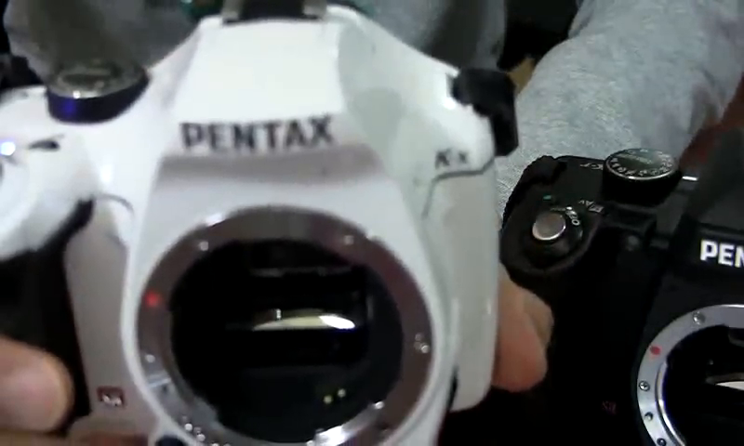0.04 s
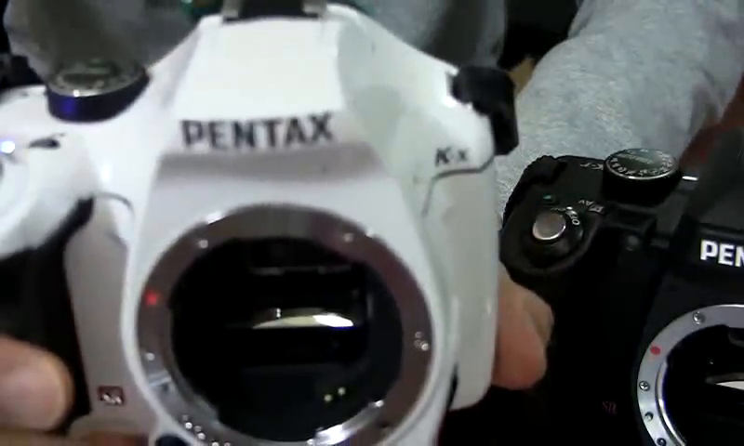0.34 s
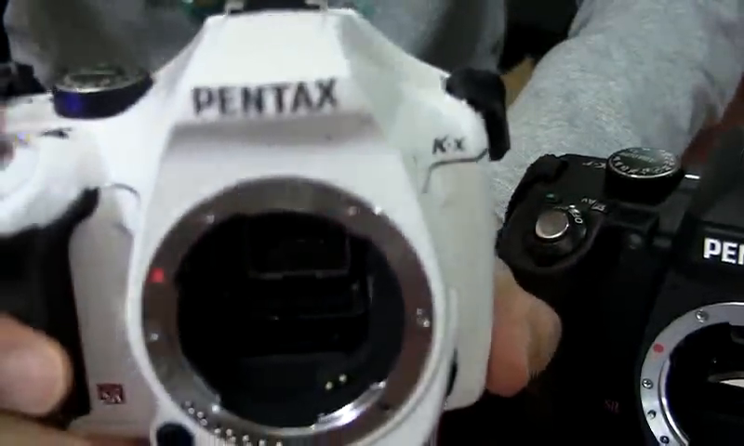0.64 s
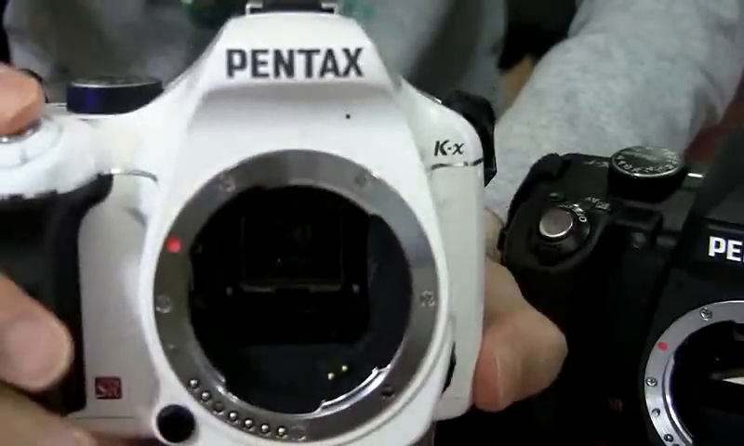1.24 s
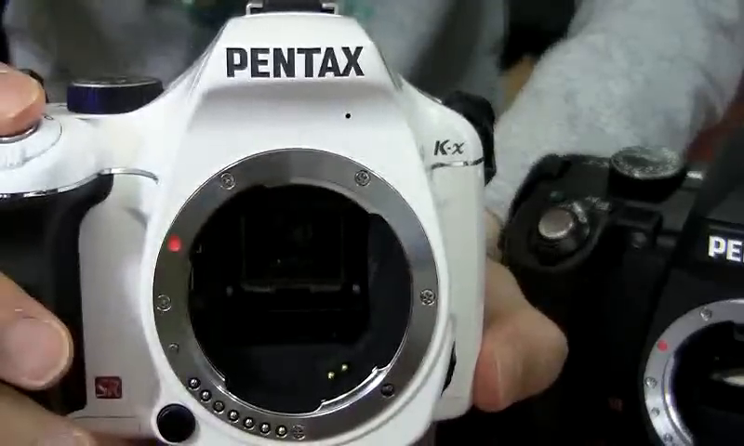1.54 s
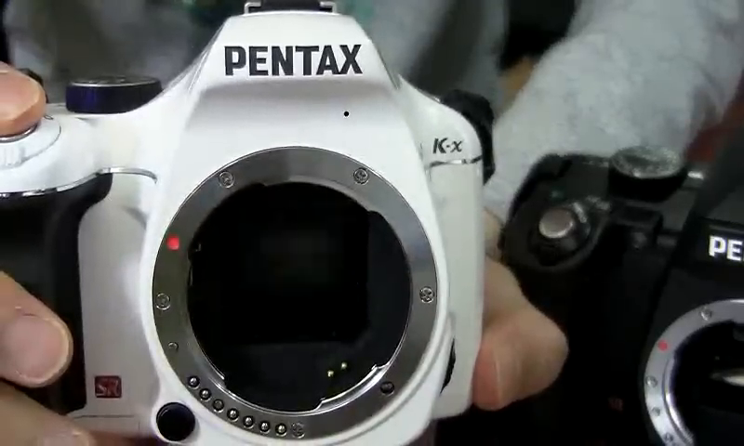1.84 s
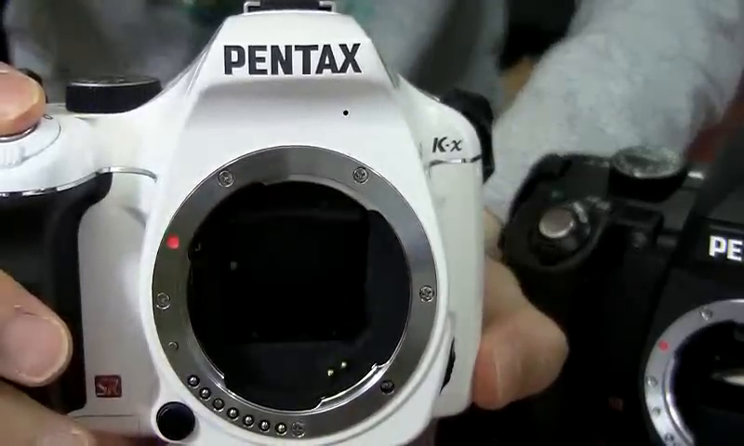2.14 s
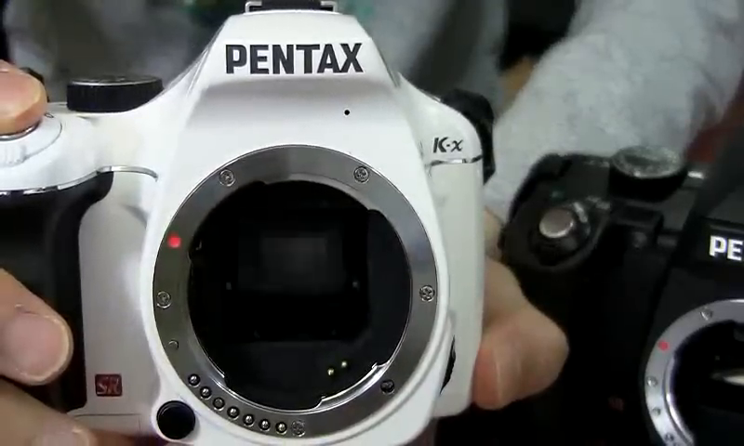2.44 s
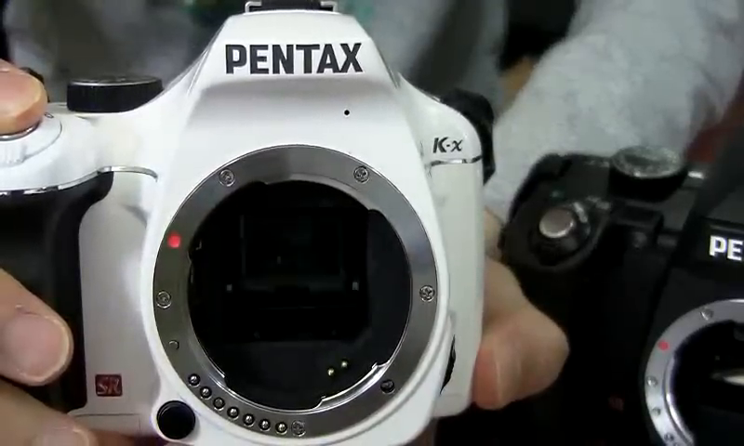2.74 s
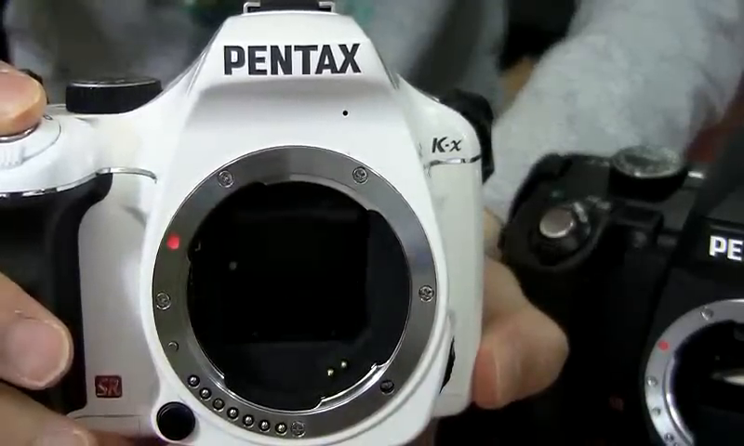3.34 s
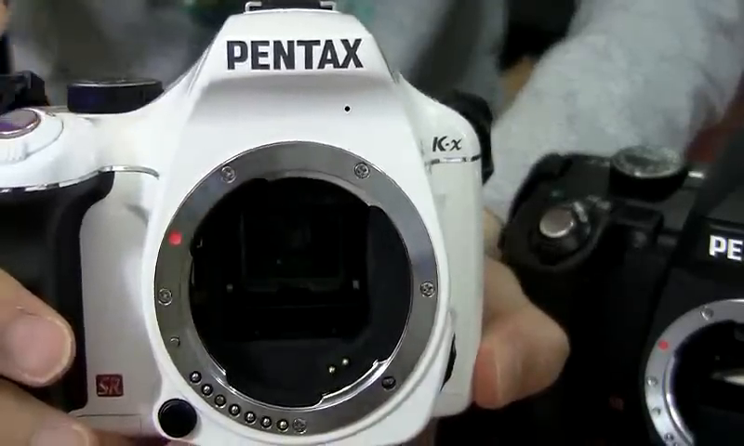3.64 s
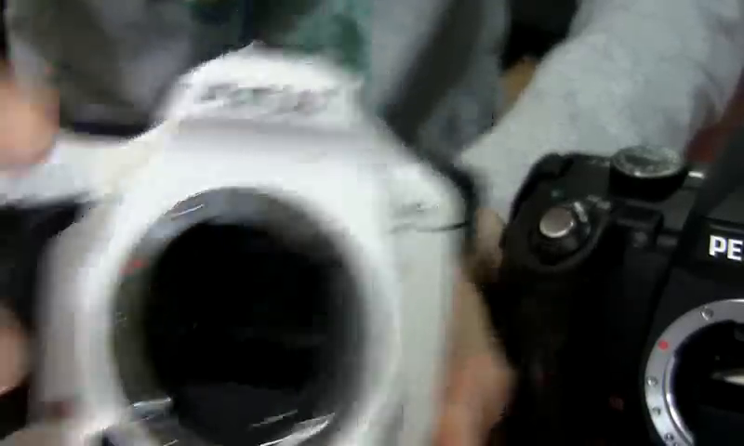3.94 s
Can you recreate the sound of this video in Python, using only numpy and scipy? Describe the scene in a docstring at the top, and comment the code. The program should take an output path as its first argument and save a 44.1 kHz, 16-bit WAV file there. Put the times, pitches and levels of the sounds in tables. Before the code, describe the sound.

A camera shutter fires a rapid burst of seven sharp clacks, close to the microphone in a small room. Before it, a fan rumbles and fingers faintly rub the camera; afterwards the release button clicks softly.

```python
"""A small room with a rumbling fan. Close up, a lensless reflex camera fires seven frames, four a second.
In each frame the mirror lifts, two shutter curtains snap across, the mirror drops and bounces, and a
geared motor recocks it. Fingers rub the shell; the release clicks before and after the burst.
The recorder's gain control holds the fan up, ducks it under the burst and lets it creep back."""
import sys
import numpy as np
from scipy import signal
from scipy.fft import rfft, irfft
from scipy.io import wavfile
from scipy.ndimage import uniform_filter1d, minimum_filter1d

SR = 44100
rng = np.random.default_rng(int(sys.argv[2]) if len(sys.argv) > 2 else 0)


def waveform_to_disk(signal):
    """Save audio, clipped to [-1, 1], as 16-bit WAV at the path in sys.argv[1]."""
    frames = np.transpose(np.atleast_2d(signal))
    scaled = np.clip(frames, -1, 1) * 32767
    samples = np.round(scaled).astype(np.int16)
    wavfile.write(sys.argv[1], SR, samples)


N = 176400

# Fan hum lines. Each row: frequency in Hz, level in dB.
FAN_HUM = [(60, -52.5), (119, -46), (152, -45), (255, -49.5), (343, -42.5), (521, -52.5), (862, -52)]
# Finger rubs. Each row: centre in seconds, half-width in seconds, rub level in dB, hiss level in dB.
FINGER_RUBS = [(0.966, 0.026, -41.5, -60), (1.394, 0.015, -38, -42.5), (1.428, 0.028, -40, -47)]
# Grip shifts. Each row: centre in seconds, half-width in seconds, level in dB.
GRIP_BUMPS = [(.74, .03, -36), (3.846, 0.0055, -33), (3.9, 0.021, -32)]
# Shell and chassis modes. Each row: frequency in Hz, gain in dB, T60 in seconds.
BODY_MODES = [(550, -11.5, 0.016), (820, -25, 0.033), (1582, -12.5, 0.055), (2010, -2.5, 0.014),
              (2266, -5.5, 0.028), (2836, -4.5, 0.031), (3820, -6, 0.02), (4690, -1, 0.014),
              (5550, -17, 0.025), (7450, -7, 0.021), (8800, -8.5, 0.035), (10170, -4.5, 0.035),
              (11250, 0, 0.026)]
# Release and latches. Each row: start in seconds, energy in dB, T60 in seconds, ring in Hz,
# ring-to-tick amplitude ratio.
RELEASE_CLICKS = [(.625, -18, .04, 3350, 0.53), (1.8190, 4, 0.016, 735, 0.6),
                  (1.8202, 4.5, .018, 2730, 0.28), (1.8404, 2, 0.033, 10100, 0.34),
                  (1.8437, 8.5, 0.028, 550, 0.77), (3.916, -0.5, 0.035, 2900, 1.2),
                  (3.932, -11, 0.034, 2290, 0.73), (3.976, -13.5, 0.04, 3030, 0.42)]
# Frames. Each row: first curtain, second curtain and mirror drop times in seconds, level in dB.
FRAME_TIMES = [(1.8833, 1.9328, 1.9951, 0), (2.1238, 2.1732, 2.2367, 0), (2.3652, 2.4147, 2.4767, 0),
               (2.6053, 2.6532, 2.7167, 0), (2.8441, 2.8919, 2.9546, -1), (3.0828, 3.1335, 3.1961, 0),
               (3.3236, 3.3725, 3.4346, 0)]
# Contacts in a stroke. Each row: delay in seconds, energy in dB, T60 in seconds.
FIRST_CURTAIN_HITS = [(0, 9.5, 0.0071), (.002, -17, 0.044), (.0065, -13, 0.012)]
SECOND_CURTAIN_HITS = [(-.0068, -14.5, 0.026), (-.002, -1, 0.016), (-.0002, 1, 0.0085), (.003, 3.5, 0.008),
                       (.0058, -6, 0.0044)]
MIRROR_UP_HITS = [(-.0142, -11, .025), (-.0073, -15.5, .014)]
MIRROR_DOWN_HITS = [(0, 5.5, 0.0064), (.0015, 8, 0.0072), (.0128, 3.5, 0.0098), (.0206, -2, 0.016),
                    (.027, -21, 0.075)]
PAWL_HITS = [(-.0268, -8, .011)]
# Brake knocks, first curtain then second. Each row: delay in seconds, energy in dB, frequency in Hz.
CURTAIN_BRAKES = [(.0066, -13, 620), (0.00425, -21, 470)]
# Rasp envelopes. Each row: delay in seconds, level in dB.
LEVER_ENVELOPE = [(-.035, -56), (-.018, -39.5), (-.013, -35), (-.008, -28.5), (-.001, -29.5), (0.011, -37),
                  (0.02, -59), (.05, -61)]
MOTOR_ENVELOPE = [(-.03, -28), (-.018, -39), (-.005, -31), (.003, -22.5), (.01, -32), (.021, -26),
                  (0.031, -22), (0.036, -29), (0.044, -32.5), (0.06, -53), (0.092, -52)]
# Spectra. Each row: frequency in Hz, relative level in dB.
FAN_SPECTRUM = [(25, -18), (45, -18.5), (60, -10.5), (80, -6.5), (100, -12.5), (125, -3.5), (160, 1),
                (230, -0.5), (320, -2.5), (400, -7), (560, -12.5), (860, -11.5), (1100, -16), (1330, -14.5),
                (1550, -20), (2600, -26.5), (7900, -34.5), (13000, -38.5), (15000, -44.5)]
ROOM_SPECTRUM = [(150, 0), (600, 2.5), (1200, 6), (3000, -0.5), (8000, 0), (15000, 1.5)]
RUB_SPECTRUM = [(1000, 4), (2800, 3), (3500, 3), (4000, -3), (4500, 2.5), (7000, -7.5), (10000, -1.5),
                (15000, -24)]
HISS_SPECTRUM = [(9000, -20), (12700, 10), (13800, 1), (15000, -31)]
BUMP_SPECTRUM = [(60, -18), (150, -3), (300, 10), (600, -20), (2000, -36)]
CLICK_SPECTRUM = [(200, 0), (600, -6), (1300, 0), (2100, 3.5), (3000, 2), (4500, -5), (8000, -8),
                  (15000, -29)]
LIFT_SPECTRUM = [(150, -15.5), (600, 2), (1100, -6), (1650, 0), (1950, 8), (2300, 0.5), (4100, -1),
                 (4650, -1), (5600, 2), (8000, -0.5), (14000, -7), (15500, -20)]
MOTOR_SPECTRUM = [(120, -57), (273, -19.5), (554, -4.5), (842, -9.5), (1090, -20), (1480, -9.5), (1800, -3),
                  (2290, -1), (3360, -4.5), (4500, -3.5), (5500, -1), (7090, -3.5), (7760, 0.5),
                  (14200, -8), (15500, -15)]
MIRROR_SPECTRUM = [(90, -53), (200, -17), (330, -6.5), (480, 0), (800, 5), (1120, -16.5), (1550, -2.5),
                   (2100, -1.5), (2850, 5.5), (3300, -2), (4800, 6.5), (5600, -3.5), (8700, 3.5),
                   (12300, -10), (13700, -1.5), (15000, -7)]
FIRST_CURTAIN_SPECTRUM = [(180, -26), (300, -40), (1200, -16.5), (2000, -7), (3810, 3.5), (6680, -0.5),
                          (7620, 6), (8840, -4), (11500, -3), (12300, -13), (14000, 4.5), (15500, -26)]
SECOND_CURTAIN_SPECTRUM = [(180, -23), (300, -23), (1240, -5), (1460, -9.5), (2320, 0), (3230, -3.5),
                           (4420, -1), (6150, 0.5), (7020, 1), (9290, -2), (13100, -4), (15500, -13)]
# Stereo width. Each row: frequency in Hz, side gain in dB.
FAN_WIDTH = [(60, -10), (110, -7), (200, -15.5), (380, -6.5), (700, -5.5), (1290, -2), (2380, 1.5),
             (4400, -1), (8120, -0.5), (15000, -5)]
ROOM_WIDTH = [(300, -37), (1300, -8.5), (2400, -0.5), (12000, 1)]
CAMERA_WIDTH = [(400, -39), (900, -24), (1450, -12), (2050, -12), (2700, -14), (3500, -15.5), (5000, -8),
                (7500, -8.5), (11000, -2.5), (14000, 3.5)]
# Stereo balance. Each row: frequency in Hz, left over right in dB.
FAN_PAN = [(60, -4), (110, -2.5), (200, -4), (380, -2.5), (700, -2.5), (1290, -2.5), (2380, -1.5),
           (4400, 0.5), (8120, -0.5), (15000, -1)]
CAMERA_PAN = [(500, -1.5), (2200, 0.5), (5000, 0.5), (8000, -0.5), (11000, -6), (15000, -3.5)]


def undb(db):
    """Decibels to gain."""
    return 10 ** (np.asarray(db) / 20)


def unit(x):
    """Scale to unit energy."""
    return x / np.sqrt(np.sum(x ** 2, axis=-1, keepdims=True))


def add(out, start_s, x):
    """Mix x in at start_s."""
    i = int(start_s * SR)
    out[..., i:i + x.shape[-1]] += x[..., :N - i]


def gains(curve, size):
    """Gain of a (Hz, dB) curve at each FFT bin."""
    hz, db = np.array(curve, float).T
    bin_hz = np.arange(size // 2 + 1) * SR / size
    return undb(np.interp(np.log(bin_hz + 1), np.log(hz), db))


def convolve(x, response):
    """Apply an impulse response."""
    return signal.fftconvolve(x, np.atleast_2d(response), axes=-1)[:, :N]


def colour(x, spectrum, size=2048):
    """Minimum-phase filter; white noise keeps its level."""
    cepstrum = irfft(np.log(gains(spectrum, size)))
    cepstrum[1:size // 2] *= 2
    cepstrum[size // 2 + 1:] = 0
    response = irfft(np.exp(rfft(cepstrum)))
    return convolve(x, unit(response))


def stereo(x, width, pan):
    """Mid and side to left and right."""
    mid, side = rfft(x[0]), rfft(x[1]) * gains(width, N)
    lean = gains(pan, N)
    return irfft(np.array([(mid + side) * lean, mid - side]) * 2 / (1 + lean), N)


def decay(t60_s, size):
    """Exponential decay."""
    return np.exp(-np.log(1000) * np.arange(size) / SR / t60_s)


def mode(hz, t60_s, size=4096):
    """One decaying resonance, complex."""
    return decay(t60_s, size) * np.exp(2j * np.pi * hz * np.arange(size) / SR)


def crack(noise, t60_s):
    """Short contact: even spectrum, unit energy."""
    envelope = decay(t60_s, noise.shape[-1])
    phase = np.angle(rfft(noise * envelope))
    return unit(irfft(np.exp(1j * phase)) * np.sqrt(envelope))


def friction(spread_db, grain_s):
    """Noise whose strength jumps from one tiny catch to the next."""
    grain_index = (np.arange(N) / SR / grain_s).astype(int)
    catches = undb(spread_db * rng.standard_normal(N)[grain_index])
    return rng.standard_normal((2, N)) * catches / np.sqrt(np.mean(catches ** 2))


def fan(rumble_db=-29.5, wander_hz=2.97):
    """Steady ventilation rumble with wavering hum lines."""
    t = np.arange(N) / SR
    out = undb(rumble_db) * colour(rng.standard_normal((2, N)), FAN_SPECTRUM, size=16384)
    for hz, db in FAN_HUM:
        wander = np.interp(t, np.linspace(0, N / SR, 41), rng.standard_normal(41))
        phase = 2 * np.pi * np.cumsum(hz + wander_hz * wander) / SR
        out[0] += np.sqrt(2) * undb(db) * np.sin(phase)
    return stereo(out, FAN_WIDTH, FAN_PAN)


def room(x, level_db=-14, t60_s=0.38, gap_s=0.00215, size=30000):
    """Short diffuse tail of a furnished room, fed by the mid channel."""
    tail = rng.standard_normal((2, size)) * decay(t60_s, size) * (np.arange(size) > gap_s * SR)
    reverb = undb(level_db) * colour(convolve(x[:1], unit(tail)), ROOM_SPECTRUM)
    return stereo(reverb, ROOM_WIDTH, CAMERA_PAN)


def skin_swells(touches, spectrum):
    """Scratchy swells of skin on plastic."""
    t = np.arange(N) / SR
    envelope = sum(undb(db) * np.exp(-((t - at_s) / width_s) ** 2) for at_s, width_s, db in touches)
    return colour(envelope * friction(spread_db=2, grain_s=.0012), spectrum)


def fingers():
    """Fingers rub and hiss on the shell, and bump it as the grip shifts."""
    at_s, width_s, rub_db, hiss_db = zip(*FINGER_RUBS)
    rubs = skin_swells(zip(at_s, width_s, rub_db), RUB_SPECTRUM)
    hiss = skin_swells(zip(at_s, width_s, hiss_db), HISS_SPECTRUM)
    return rubs + hiss + skin_swells(GRIP_BUMPS, BUMP_SPECTRUM)


def body(x):
    """Shell and chassis ring with every contact."""
    response = sum(undb(db) * 2 * np.log(1000) / (t60_s * SR) * mode(hz, t60_s).real
                   for hz, db, t60_s in BODY_MODES)
    return x + convolve(x, response)


def release(ring_t60_s=0.015, size=2048):
    """The release trips and is let go; each click rings its own small part."""
    ticks, rings = np.zeros((2, 2, N))
    for start_s, db, t60_s, ring_hz, ring_ratio in RELEASE_CLICKS:
        add(ticks, start_s, undb(db) * crack(rng.standard_normal((2, size)), t60_s))
        add(rings[:1], start_s, undb(db) * ring_ratio * unit(mode(ring_hz, ring_t60_s).real))
    return colour(ticks, CLICK_SPECTRUM) + rings


def rasp(times_s, curve, spectrum):
    """Gear teeth or sliding levers rasp, swelling once a frame."""
    t = np.arange(N) / SR
    delay_s, db = np.array(curve).T
    envelope = sum(undb(np.interp(t - at_s, delay_s, db, left=-np.inf, right=-np.inf)) for at_s in times_s)
    return colour(envelope * friction(spread_db=3.0, grain_s=0.00088), spectrum)


def strokes(times_s, levels_db, hits, spectrum, variation=0.95, scatter_db=1.1, size=2048):
    """A part hits its stops; each contact is partly alike in every frame."""
    out = np.zeros((2, N))
    for delay_s, db, t60_s in hits:
        common = rng.standard_normal((2, size))
        for at_s, frame_db in zip(times_s, levels_db):
            noise = common + variation * rng.standard_normal((2, size))
            gain = undb(db + frame_db + scatter_db * rng.standard_normal())
            add(out, at_s + delay_s, gain * crack(noise, t60_s))
    return colour(out, spectrum)


def motor(drop_s, levels_db):
    """A pawl ticks and the geared motor recocks the camera around each mirror drop."""
    pawl = strokes(drop_s, levels_db, PAWL_HITS, SECOND_CURTAIN_SPECTRUM)
    return pawl + rasp(drop_s, MOTOR_ENVELOPE, MOTOR_SPECTRUM)


def mirror(first_s, drop_s, levels_db):
    """Levers slide, the mirror hits its top stop ahead of the first curtain, then drops and bounces."""
    levers = rasp(first_s, LEVER_ENVELOPE, LIFT_SPECTRUM)
    up = strokes(first_s, levels_db, MIRROR_UP_HITS, LIFT_SPECTRUM)
    down = strokes(drop_s, levels_db, MIRROR_DOWN_HITS, MIRROR_SPECTRUM)
    return levers + up + down


def curtains(first_s, second_s, levels_db, brake_t60_s=.011):
    """Two curtains snap across; their brakes knock the body."""
    out = strokes(first_s, levels_db, FIRST_CURTAIN_HITS, FIRST_CURTAIN_SPECTRUM)
    out += strokes(second_s, levels_db, SECOND_CURTAIN_HITS, SECOND_CURTAIN_SPECTRUM)
    for times_s, (delay_s, db, hz) in zip((first_s, second_s), CURTAIN_BRAKES):
        knock = undb(db) * unit(mode(hz, brake_t60_s).imag)
        for at_s in times_s:
            add(out, at_s + delay_s, knock)
    return out


def burst(gain_db=24):
    """Curtains, mirror and motor through all frames."""
    first_s, second_s, drop_s, levels_db = np.array(FRAME_TIMES).T
    shutter = curtains(first_s, second_s, levels_db)
    return undb(gain_db) * (shutter + mirror(first_s, drop_s, levels_db) + motor(drop_s, levels_db))


def scene():
    """Close camera, its wider room tail and the fan."""
    camera = body(burst() + release()) + fingers()
    return stereo(camera, CAMERA_WIDTH, CAMERA_PAN) + room(camera) + fan()


def record(dry):
    """Gain control drops fast, holds and rises slowly; peaks clip and the top is cut."""
    threshold_db, ratio, rise_db_per_s = -23, 5.12, 34.5
    window_s, attack_s, hold_s = 0.0098, 0.002, 0.13
    ceiling, cutoff_hz = .8, 15100
    power = uniform_filter1d(np.mean(dry ** 2, axis=0), int(window_s * SR))
    level_db = 10 * np.log10(np.maximum(power, 1e-12))
    wanted_db = np.minimum(0, threshold_db - level_db) * (1 - 1 / ratio)
    half_hold = int(hold_s * SR / 2)
    held_db = minimum_filter1d(wanted_db, 2 * half_hold + 1, origin=half_hold, mode="nearest")
    ramp_db = rise_db_per_s * np.arange(N) / SR
    slewed_db = np.minimum.accumulate(held_db - ramp_db) + ramp_db
    pole = np.exp(-1 / (attack_s * SR))
    gain = undb(signal.lfilter([1 - pole], [1, -pole], slewed_db))
    lowpass = signal.ellip(8, .2, 70, cutoff_hz, fs=SR, output="sos")
    return signal.sosfilt(lowpass, np.clip(dry * gain, -ceiling, ceiling))


dry = scene()
out = record(dry)
waveform_to_disk(out)
```